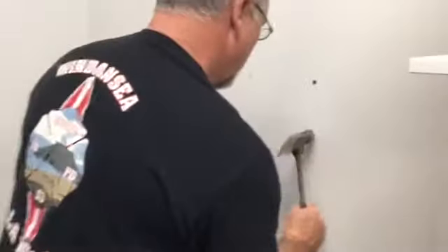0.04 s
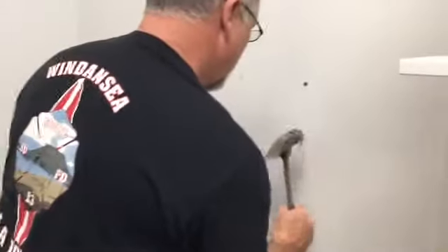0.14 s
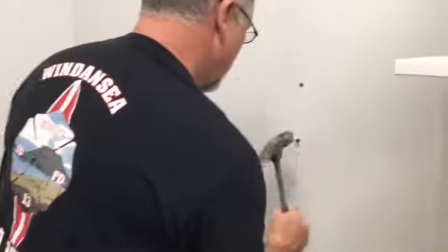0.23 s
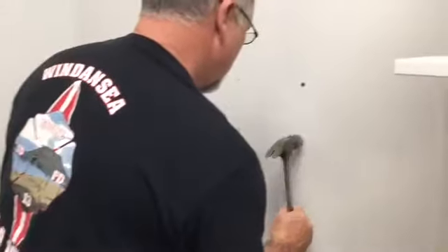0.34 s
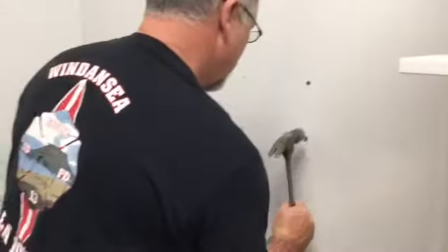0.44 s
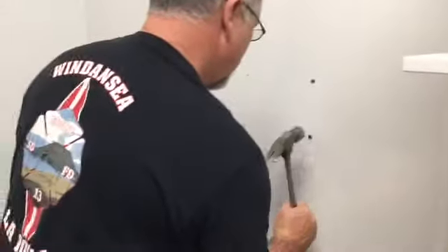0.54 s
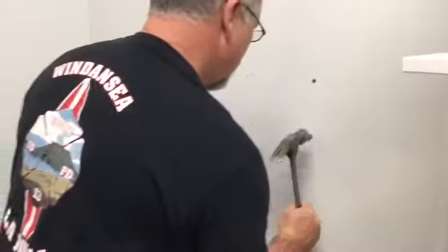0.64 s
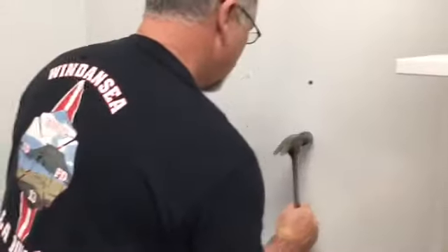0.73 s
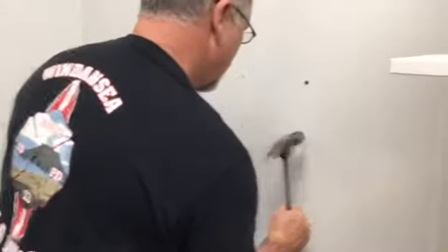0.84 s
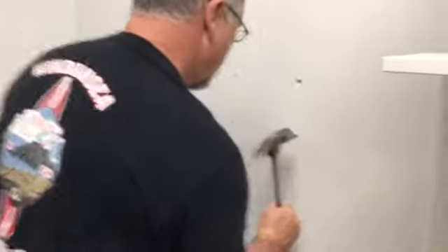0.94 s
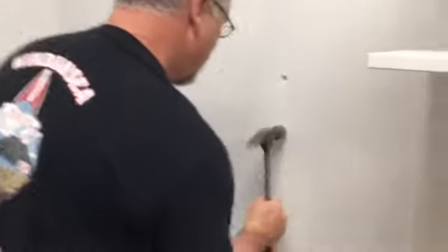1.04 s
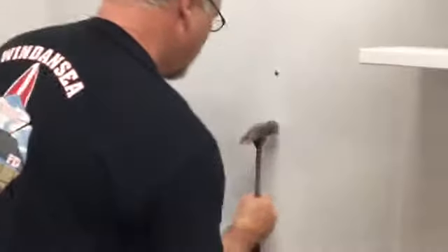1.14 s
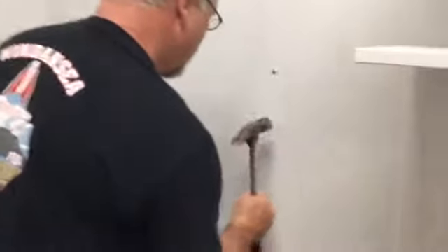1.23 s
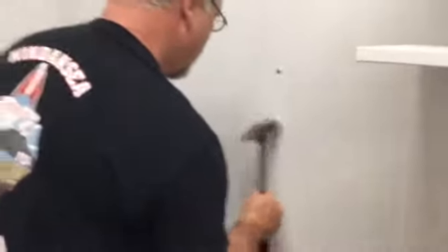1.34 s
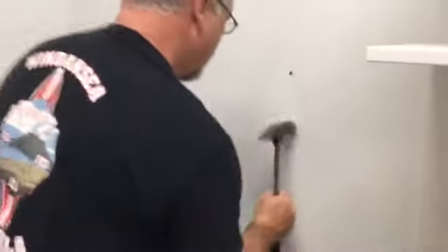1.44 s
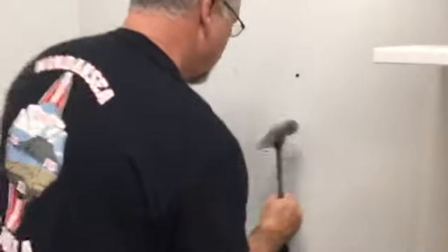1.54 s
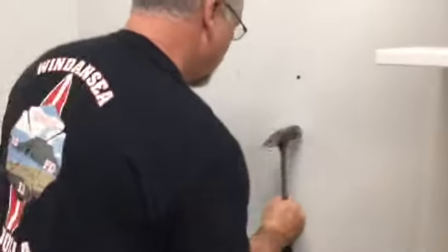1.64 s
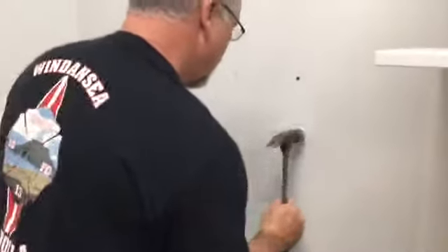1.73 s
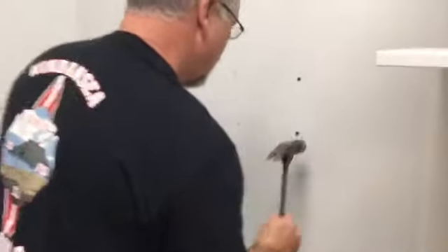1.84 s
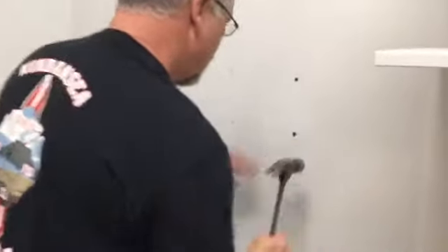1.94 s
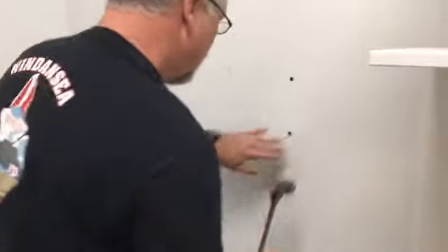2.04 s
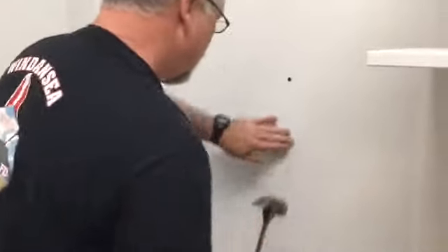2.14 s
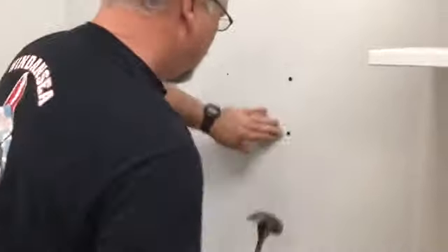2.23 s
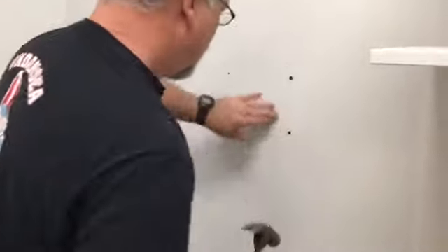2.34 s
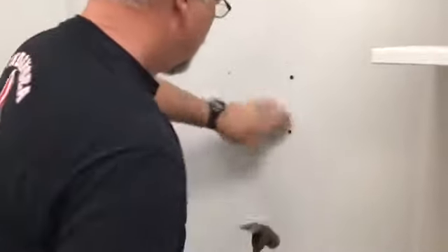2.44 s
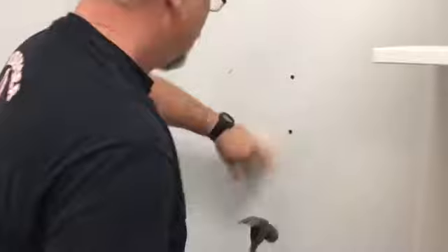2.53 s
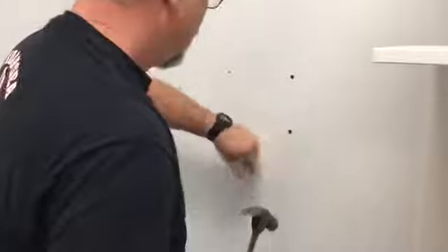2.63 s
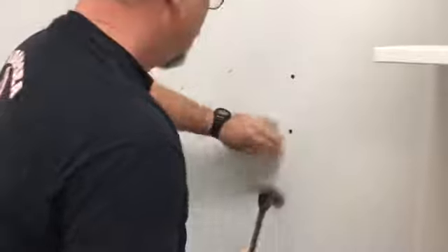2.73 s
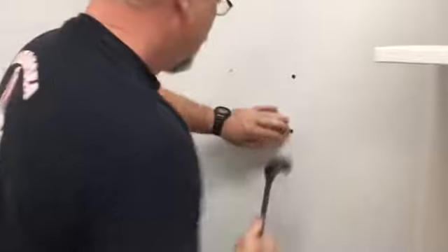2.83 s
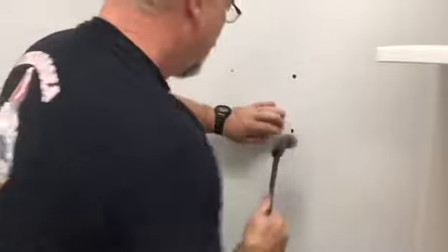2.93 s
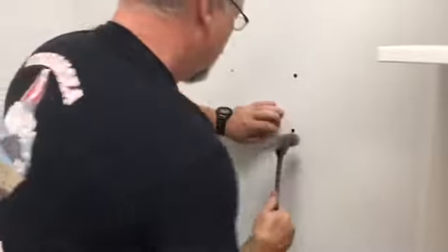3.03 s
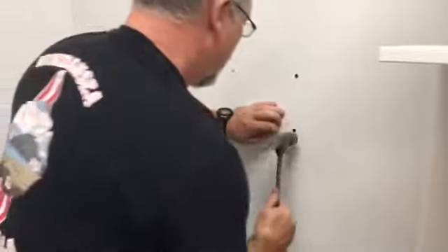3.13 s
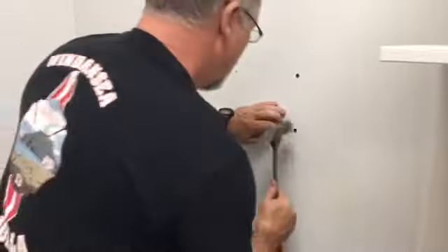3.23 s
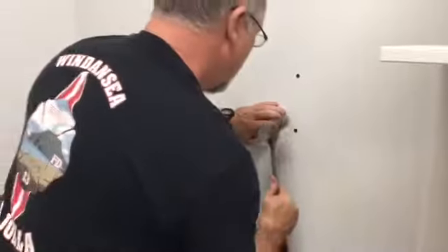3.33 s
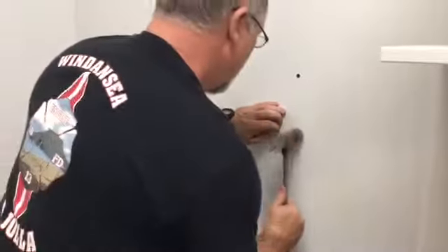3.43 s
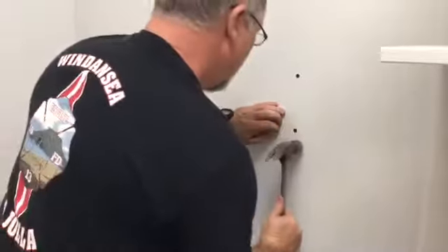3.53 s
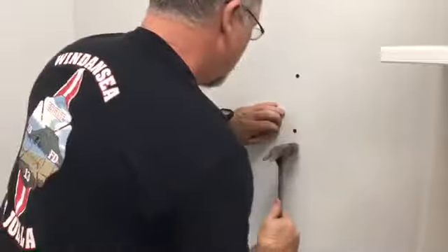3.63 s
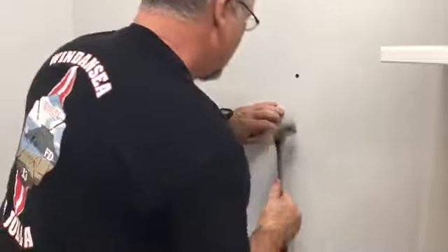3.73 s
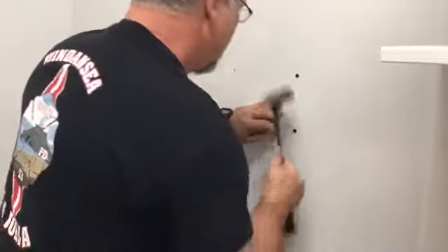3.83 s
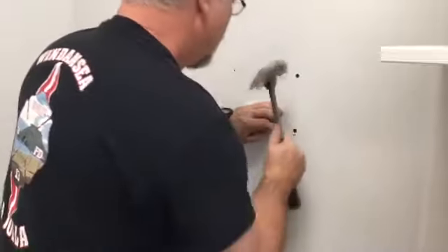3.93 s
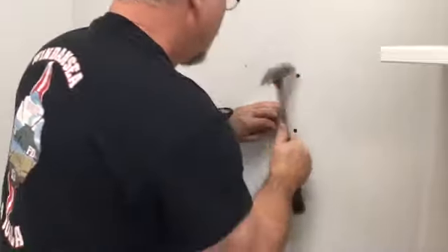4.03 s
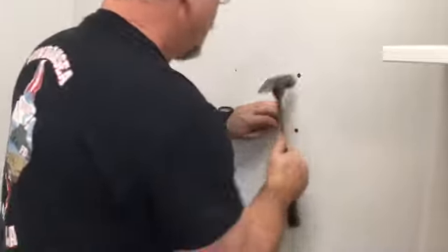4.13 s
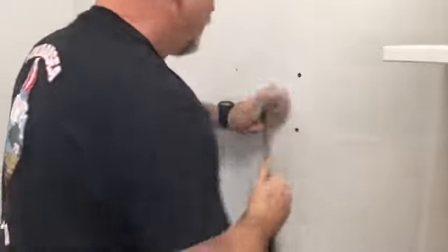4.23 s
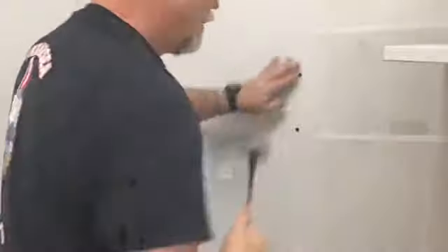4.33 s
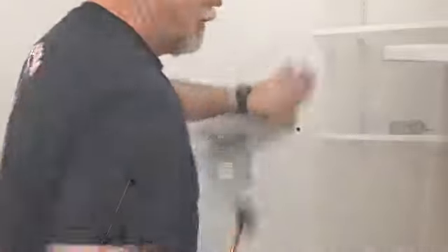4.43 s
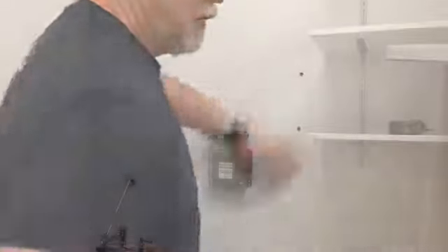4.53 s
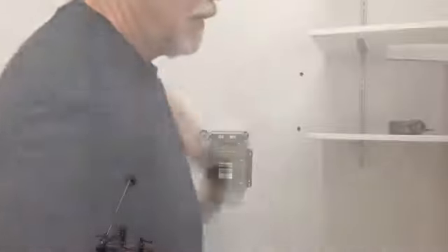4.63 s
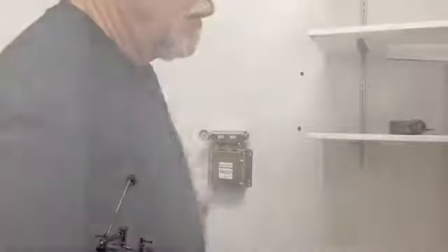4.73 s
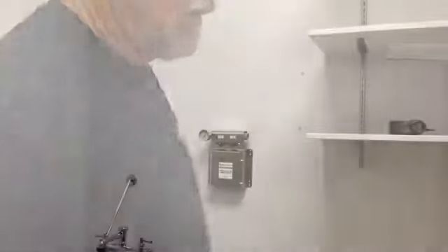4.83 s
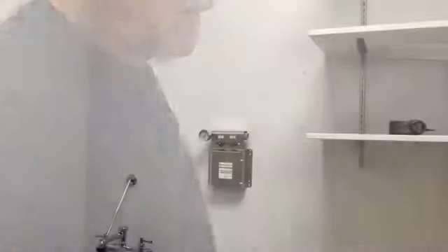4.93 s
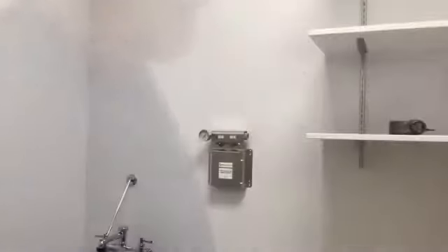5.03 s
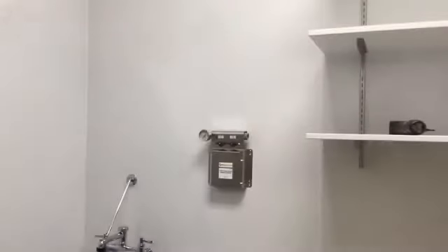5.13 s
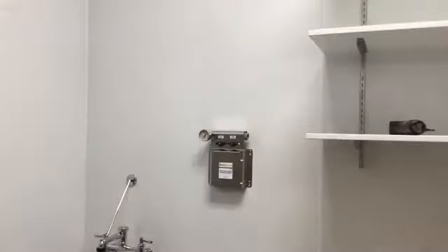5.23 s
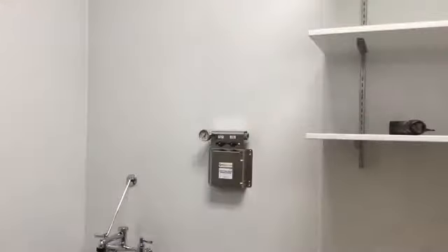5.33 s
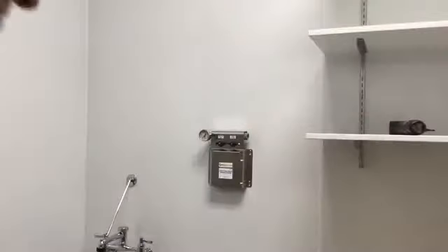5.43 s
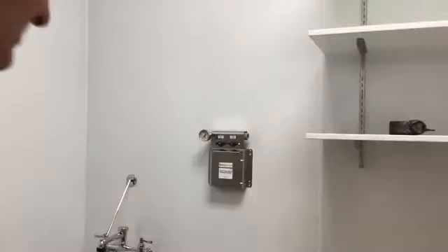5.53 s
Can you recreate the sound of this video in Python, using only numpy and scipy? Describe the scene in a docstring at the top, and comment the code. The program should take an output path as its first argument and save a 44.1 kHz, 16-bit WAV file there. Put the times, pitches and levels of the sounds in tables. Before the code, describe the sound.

Close mono pickup in a small, hard-walled room: a hammer knocks steadily on hollow board, each of six blows mostly stronger than the last, with a woody crack and low boom. A gap holds only soft handling sounds over faint air hum. Two heavy single strikes follow, then near quiet with slight rustles and dull bumps.

```python
"""Hammer on a hollow wall

A hammer knocks at small holes in a hollow plasterboard wall: six quick blows that grow harder, then two hard ones.
Each blow is a noise crack coloured by board resonances, plus a swept sine boom and low waves that return.
Dense decaying noise makes the small bare room; a limiter rounds off the loudest crests.
Ventilation hums underneath as filtered noise, with soft bumps, ticks and the brushing of a hand and a shirt."""
import sys
import numpy as np
from scipy import signal
from scipy.fft import rfft, irfft, next_fast_len
from scipy.io import wavfile
from scipy.ndimage import uniform_filter1d, minimum_filter1d, map_coordinates

SR = 44100
rng = np.random.default_rng(int(sys.argv[2]) if len(sys.argv) > 2 else 0)


def to_wav(sig):
    """Store sig (one row per channel, or 1-D mono) as 16-bit WAV at the path in sys.argv[1].

    Samples outside -1..1 are clipped; the rate is SR.
    """
    pcm = np.clip(np.atleast_2d(sig), -1, 1) * 32767
    pcm = np.round(pcm).astype(np.int16)
    wavfile.write(sys.argv[1], SR, pcm.T)  # frames by channels


N = 246210
AGE = np.arange(SR) / SR  # time since a sound began, s
HZ = np.fft.rfftfreq(2 * SR, 1 / SR)  # frequency grid of the filters


def amp(db):
    """Turn decibels into a linear gain."""
    return 10 ** (np.asarray(db) / 20)


def unit(x, size=None):
    """Scale to rms 1 over the first size samples."""
    return x / np.sqrt(np.mean(x[:size] ** 2) + 1e-20)


def along(points, hz):
    """Interpolate (Hz, value) points on a log frequency axis."""
    point_hz, value = np.transpose(points)
    return np.interp(np.log(hz + 1), np.log(point_hz + 1), value)


def add(track, s, sound):
    """Mix a sound in at time s."""
    part = track[round(s * SR):][:len(sound)]
    part += sound[:len(part)]


def coloured(x, db):
    """Pass one second of sound through a causal (minimum-phase) filter with this gain on HZ."""
    cepstrum = irfft(np.log(amp(db)))
    # folding the cepstrum onto positive time makes the filter causal
    cepstrum[1:SR] *= 2
    cepstrum[SR + 1:] = 0
    response = np.exp(rfft(cepstrum))
    return irfft(rfft(x, 2 * SR) * response)[:SR]


def noise(spectrum):
    """Steady coloured noise of rms 1."""
    m = next_fast_len(N)
    gain = amp(along(spectrum, np.fft.rfftfreq(m, 1 / SR)))
    white = rng.standard_normal(m)
    return unit(irfft(rfft(white) * gain, m)[:N])


def burst(t60):
    """White noise that dies away by 60 dB in t60 seconds."""
    return rng.standard_normal(SR) * amp(-60 * AGE / t60)


def ripple(spacing_hz):
    """Random peaks and dips on HZ, as crowded modes make them."""
    return map_coordinates(rng.standard_normal(4000), [HZ / spacing_hz], mode='wrap')


# The hammer blows. Each row: start in seconds, force in dB, boom of the board in dB,
# treble lift in dB at 12 kHz (none below 4 kHz), delay of the boom in seconds.
BLOW_CUES = [(0.0591, -17, -14.5, -3.5, 0.0007), (0.4102, -12, -13.5, 4.5, 0.0083),
             (0.7576, -10, -7.5, 0, 0.0018), (1.0908, -3.5, -3, 0, 0.00071), (1.4287, 1, -4.5, 1, 0.00059),
             (1.7292, 1.5, -6, -2, 0), (3.4721, 3, -6, -1, 0.003), (4.1365, 0, -4.5, -0.5, 0.00072)]
# Steel on plaster, the colour of a hard blow. Each row: frequency in Hz, gain in dB.
STEEL_ON_PLASTER = [(40, -14.5), (90, -10.5), (170, -3), (300, -0.5), (430, -5.5), (580, -6.5), (720, -11),
                    (1000, -14.5), (1400, -16.5), (2200, -19), (2900, -27.5), (3400, -30.5), (4000, -33.5),
                    (6000, -41), (8700, -44), (10000, -46.5), (13000, -42.5), (15500, -46)]
# Resonances of the board and the hammer. Each row: frequency in Hz, width in Hz, peak in dB.
BOARD_RESONANCES = [(332.9, 24, 6.5), (445, 24, 1.5), (546, 32, 4.5), (593, 32, 5), (817, 28, 6),
                    (894, 19, 5), (1035, 50, 4), (1217, 230, 6), (1420, 77, 0.5), (1588, 87, 4.5),
                    (1715, 40, 5.5), (2470, 430, 1.5), (2900, 200, 0), (3440, 79, 2)]
# A harder blow gains most in the knock, less in the treble.
# Each row: frequency in Hz, growth in dB per dB of force.
FORCE_GROWTH = [(430, 0.99), (1100, 1.38), (2400, 0.91), (5000, 0.82), (12000, 0.77)]
CONTACT_DB, LOW_KNOCK_DB = 5, 2.5  # contact noise at force 0; lift of its hollow low end
# only hard blows bend the board sharply: level at force 0, dB per dB of force
THWACK_DB, THWACK_GROWS = -3.5, 3
# light blows are drier: crack over the echoes at force 0, dB less per dB of force
CRACK_DB, CRACK_SHRINKS = 0.5, 0.55
BOOM_HZ, BOOM_SCATTER = 120.76, 0.009  # the panel's main mode; spread of its pitch from spot to spot, as a share
SWELL_DB = 3.5  # the panel's main mode over its returning waves


def hammer(ripple_db, spot_db):
    """Contact noise coloured by the board's resonances, then boom and returning waves; force sets the balance."""
    out = np.zeros(N)
    room = echoes()
    peaks_db = sum(db / (1 + (2 * (HZ - hz) / width) ** 2) for hz, width, db in BOARD_RESONANCES)
    crowded_db = ripple_db * ripple(spacing_hz=88.2) * np.clip(HZ / 2000 - 1, 0, 1)
    hollow_db = along([(430, LOW_KNOCK_DB), (1500, 0.0055)], HZ)
    board_db = along(STEEL_ON_PLASTER, HZ) + peaks_db + crowded_db + hollow_db
    treble = along([(4000, 0), (12000, 1)], HZ)
    for s, force_db, boom_db, bright_db, lag in BLOW_CUES:
        # each spot on the wall favours other modes
        spot = spot_db * ripple(spacing_hz=119.2) * np.clip(HZ / 400 - 1, 0, 1)
        strength_db = force_db * along(FORCE_GROWTH, HZ) + bright_db * treble + spot
        crack_db = CRACK_DB - CRACK_SHRINKS * force_db
        contact = impact(room, crack_db, crack_t60=0.055, click_db=5.5, late_db=-24.5, late_t60=0.95)
        thwack_db = THWACK_DB + THWACK_GROWS * force_db
        boom_hz = BOOM_HZ * (1 + BOOM_SCATTER * rng.standard_normal())
        main_mode = boom(boom_db + SWELL_DB, thwack_db, hz=boom_hz, sweep_hz=2377, sweep_s=.001,
                         swell_s=0.031, fade_t60=0.27, thwack_t60=0.027)
        add(out, s, amp(CONTACT_DB) * coloured(contact, board_db + strength_db))
        add(out, s + lag, main_mode)
        add(out, s + lag, amp(boom_db) * returns(scatter_db=1.5))
    return out


# The crack bounces off the shelves, side walls and ceiling. Each row: delay in seconds, level in dB.
CRACK_BOUNCES = [(.0045, -11.5), (.0085, -10), (0.0159, -18.5), (.0185, -11.5), (.027, -19), (0.041, -17)]


def impact(room, crack_db, crack_t60, click_db, late_db, late_t60):
    """The click of steel and a short crack with their bounces, the room's echoes and a faint, dull late tail."""
    click = unit(rng.standard_normal(SR) * np.exp(-((AGE - .0014) / .0005) ** 2), size=100)
    bright = coloured(click, along([(500, -14), (2500, -7), (5000, -2), (9000, 0)], HZ))
    crack = burst(crack_t60) * (1 - np.exp(-AGE / 0.0017))
    direct = amp(crack_db) * (crack + amp(click_db) * bright)
    # mostly the same echoes for every blow
    near = (0.92 * room + .5 * echoes()) * (1 - np.exp(-AGE / 0.0039))
    dull = along([(100, -9.0), (500, 0), (1500, 1.5), (3500, -1.5), (8000, -13.5)], HZ)
    late = coloured(amp(late_db) * burst(late_t60), dull)
    out = direct + near + late
    for delay_s, db in CRACK_BOUNCES:
        add(out, delay_s, amp(db) * direct)
    return out


# Decay of the small bare room. Each row: frequency in Hz, t60 in seconds.
ROOM_DECAY = [(100, 0.57), (500, 0.2), (1500, 0.31), (4000, 0.29), (8000, .27), (14000, .23)]


def echoes():
    """Dense room echoes: noise in which each frequency fades at its own speed."""
    hz, t, z = signal.stft(rng.standard_normal(SR), SR, nperseg=256)
    fade = amp(-60 * t / along(ROOM_DECAY, hz)[:, None])
    return signal.istft(z * fade, SR, nperseg=256)[1][:SR]


def boom(boom_db, thwack_db, hz, sweep_hz, sweep_s, swell_s, fade_t60, thwack_t60):
    """Bending waves: the short ones arrive first as a falling thwack, then the panel's main mode swells."""
    pitch_hz = hz + sweep_hz / (1 + AGE / sweep_s) ** 2
    rise = 1 - np.exp(-AGE / swell_s)
    cut = 1 + (AGE / .024) ** 4  # ends the swell much sooner than its fade alone
    swell = unit(rise * amp(-60 * AGE / fade_t60) / cut, size=1760)
    thwack = (1 - np.exp(-AGE / 0.00065)) * amp(-60 * AGE / thwack_t60)
    wave = np.sin(2 * np.pi * np.cumsum(pitch_hz) / SR)
    return (amp(boom_db) * swell + amp(thwack_db) * thwack) * wave


# Low waves that swell again as they come back across the wall.
# Each row: frequency in Hz, level in dB over the boom, arrival in seconds, rise in seconds.
RETURNING_WAVES = [(54.3, -22.5, 0.014, 0.018), (81.2, -16, 0.028, 0.012), (215.7, -6.5, .024, 0.015),
                   (130.9, -8, .036, 0.02), (169, -14.5, 0.084, 0.017), (245.6, -21.5, 0.029, 0.017),
                   (122, -22.5, .122, 0.016)]


def returns(scatter_db):
    """Each low wave packet swells and fades once, a little differently for every spot that is struck."""
    hz, db, arrival_s, rise_s = np.transpose(RETURNING_WAVES)[:, :, None]
    size, detune = rng.standard_normal((2, len(RETURNING_WAVES), 1))
    age = np.maximum(AGE - arrival_s, 0)
    u = age / rise_s
    swell = (u * np.exp(1 - u)) ** 2
    waves = np.sin(2 * np.pi * hz * (1 + 0.018 * detune) * age)
    return np.sum(amp(db + scatter_db * size) * swell * waves, axis=0)


# Soft bumps of hands and feet. Each row: start of the tap in seconds, thud in dB, tap in dB.
SOFT_BUMPS = [(2.552, -44, -63.5), (4.545, -51.5, -81), (5.232, -50.5, -52.5), (5.346, -46.5, -56)]
# Light scrapes and ticks. Each row: start in seconds, level in dB, t60 in seconds.
LIGHT_TICKS = [(1.663, -56.5, 0.15), (4.919, -68, 0.014), (5.004, -72, 0.22)]


def handling():
    """Dull thuds of filtered room echoes, each with a light noise tap, and small bright scrapes."""
    out = np.zeros(N)
    thud = along([(30, -6), (70, 8), (105, 16), (160, -5), (300, -5.5), (800, -47.5)], HZ)
    tap = along([(150, -32.0), (400, 6), (1200, -4), (3000, -23), (6000, -45), (14000, -32)], HZ)
    scrape = along([(500, -22.5), (2300, 0), (3000, 12), (4200, -1.5), (7000, -8), (14000, -16)], HZ)
    for s, thud_db, tap_db in SOFT_BUMPS:
        add(out, s - .01, amp(thud_db) * unit(coloured(echoes(), thud), size=1800))
        add(out, s, amp(tap_db) * unit(coloured(burst(0.18), tap), size=1300))
    for s, db, t60 in LIGHT_TICKS:
        add(out, s, amp(db) * unit(coloured(burst(t60), scrape), size=450))
    return out


# Strokes of a hand over the wall and of the shirt.
# Each row: strongest moment in seconds, length in seconds, rubbing in dB, hiss in dB.
BRUSH_STROKES = [(2.572, 0.035, -59.5, -58.5), (2.625, 0.064, -83, -71.5), (4.416, 0.12, -71.5, -69),
                 (4.544, 0.081, -75.5, -64), (4.616, .08, -75, -66), (4.855, 0.082, -68, -72.5),
                 (5.458, .14, -73, -74), (5.566, 0.1, -53.5, -57)]
# Colour of the rubbing. Each row: frequency in Hz, density in dB per Hz.
RUB_COLOUR = [(100, -12), (500, 0.5), (1300, -2.5), (3000, -6), (6000, -13.5), (15000, -15)]
# Colour of the hiss, in the strokes and the steady floor. Each row: frequency in Hz, density in dB per Hz.
HISS_COLOUR = [(1000, -3), (5000, -1), (9000, -1), (13000, 10), (15500, 2)]
# Colour of the ventilation. Each row: frequency in Hz, density in dB per Hz.
VENTILATION_COLOUR = [(15, -30.5), (25, -15.5), (69, -1.5), (136, -2.5), (203, -4), (280, -9.5), (430, -24),
                      (594, -20), (820, -29.5), (913, -28.5), (1830, -37.5), (15300, -57.5)]
# Level of the room noise. Each row: time in seconds, level in dB.
ROOM_NOISE_LEVEL = [(0, -47), (3.2, -49.5), (4.8, -51), (5.4, -46.5)]
STROKE_RISE = 0.51  # share of a stroke's length spent swelling
HISS_FLOOR_DB = -84  # faint steady hiss


def background(catch_db):
    """Room noise coloured as ventilation, and strokes of skin and cloth that swell and fade, catching and slipping."""
    t = np.arange(N) / SR
    room_noise_db = np.interp(t, *np.transpose(ROOM_NOISE_LEVEL))
    rub, hiss, brushing = noise(RUB_COLOUR), noise(HISS_COLOUR), np.zeros(N)
    for s, length, rub_db, hiss_db in BRUSH_STROKES:
        side_s = length * np.where(t < s, STROKE_RISE, 1 - STROKE_RISE)
        swell = np.exp(-((t - s) / side_s) ** 2)
        brushing += swell * (amp(rub_db) * rub + amp(hiss_db) * hiss)
    # smooth random level, 70 new values a second
    catching = map_coordinates(rng.standard_normal(1000), [t * 70], mode='wrap')
    room_noise = amp(room_noise_db) * noise(VENTILATION_COLOUR)
    return room_noise + amp(HISS_FLOOR_DB) * hiss + amp(catch_db * catching) * brushing


def scene():
    """Hammer, handling and background at one microphone."""
    return (hammer(ripple_db=1.3, spot_db=1.6) + handling() + background(catch_db=1.5))[None]


def limiter(x, ceiling, size):
    """A fast limiter rounds off the loud crests with a gain smoothed over size samples."""
    gain = np.minimum(1, ceiling / (np.abs(x) + 1e-9))
    return x * uniform_filter1d(minimum_filter1d(gain, size), size)


TOP_HZ = 15500  # upper edge of the microphone's band


def record(dry):
    """The microphone's limiter, then a steep cut above the band limit."""
    loud = limiter(dry, ceiling=0.92, size=25)
    m = next_fast_len(N + SR // 2)
    in_band = np.fft.rfftfreq(m, 1 / SR) < TOP_HZ
    return irfft(rfft(loud, m) * in_band, m)[:, :N]


dry = scene()
out = record(dry)
to_wav(out)
```